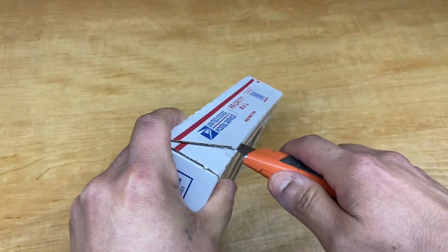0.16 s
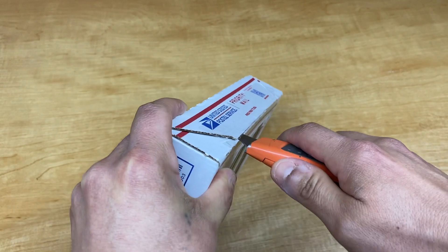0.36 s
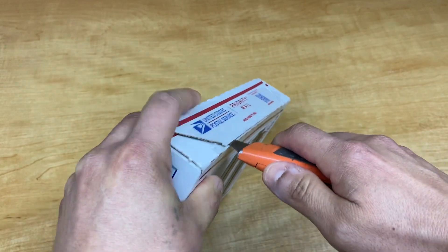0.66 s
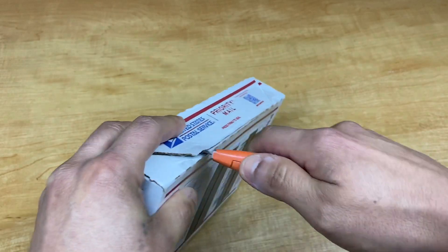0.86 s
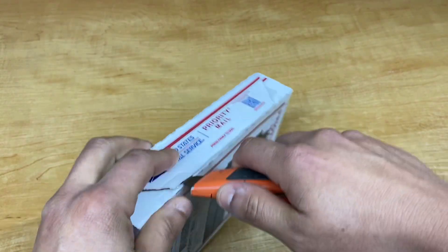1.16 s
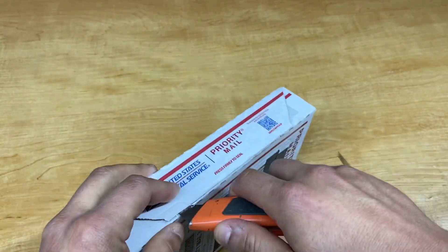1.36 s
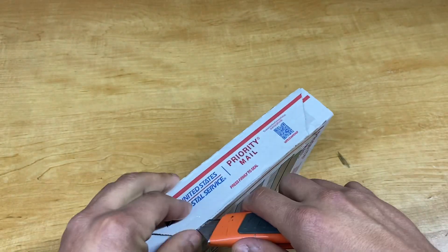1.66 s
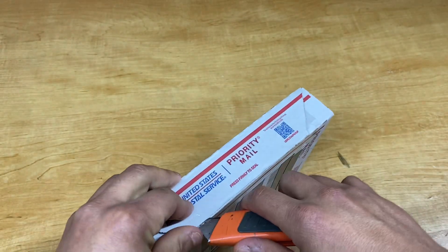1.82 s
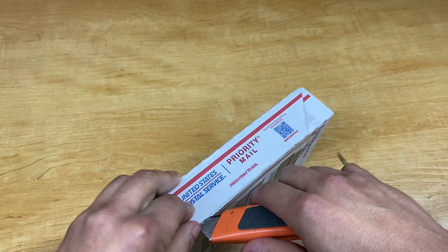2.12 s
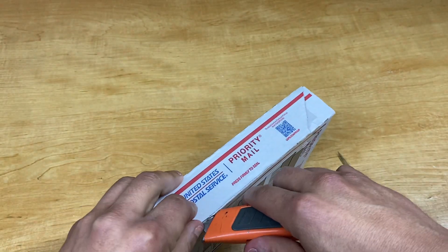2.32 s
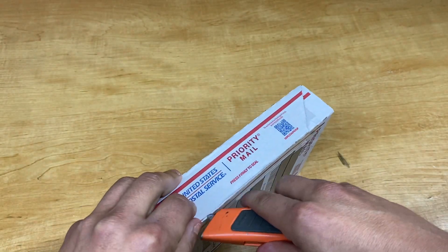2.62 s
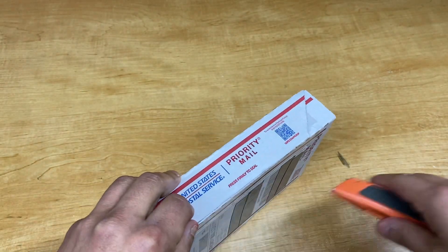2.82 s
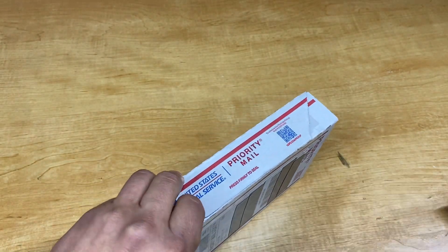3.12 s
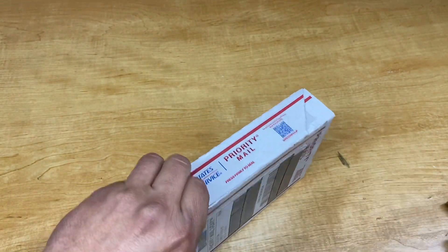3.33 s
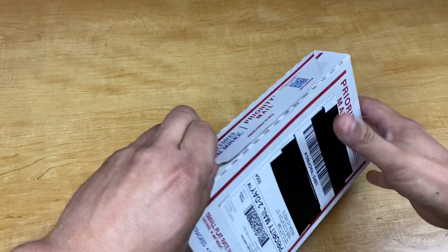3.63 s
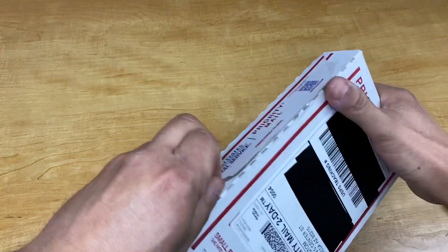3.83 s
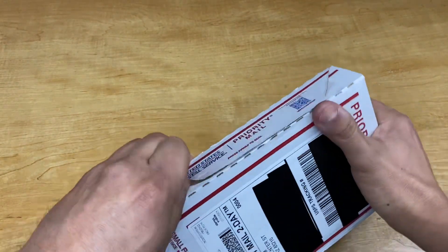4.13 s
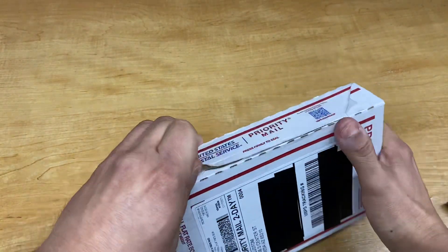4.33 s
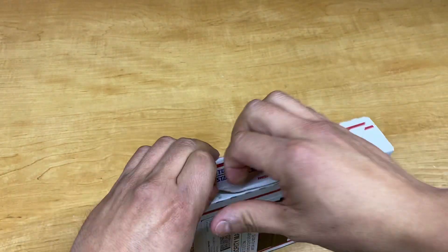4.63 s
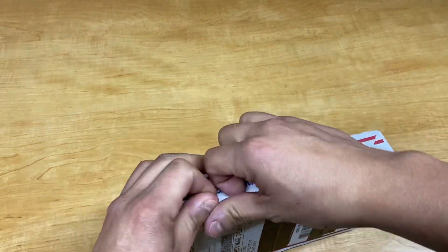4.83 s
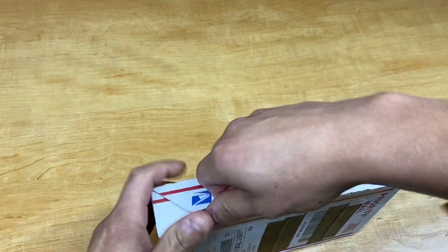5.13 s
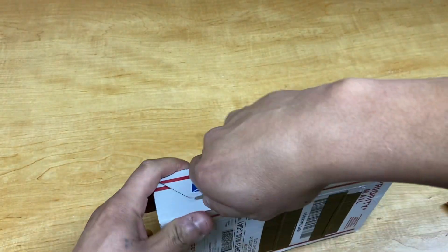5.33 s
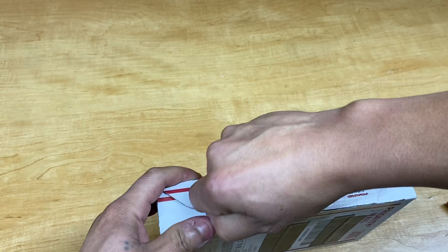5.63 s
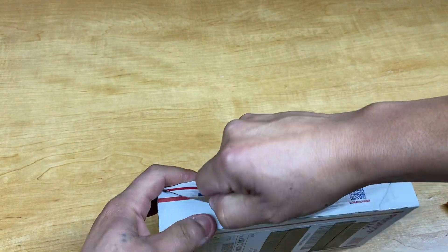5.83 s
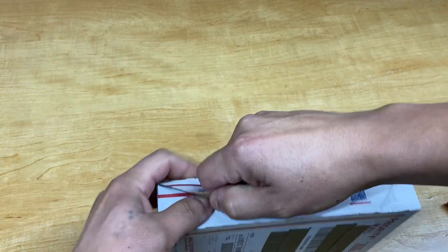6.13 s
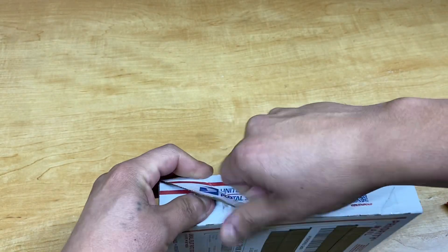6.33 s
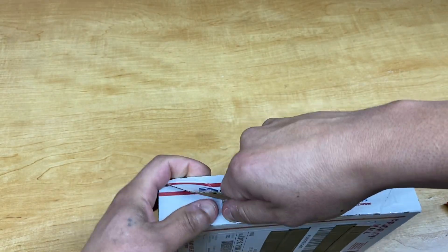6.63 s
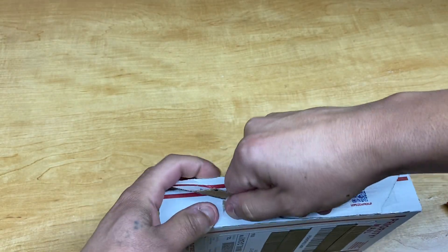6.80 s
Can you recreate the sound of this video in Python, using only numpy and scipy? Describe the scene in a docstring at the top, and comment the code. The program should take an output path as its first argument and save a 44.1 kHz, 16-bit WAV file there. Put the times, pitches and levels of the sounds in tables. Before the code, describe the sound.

Quiet picking and slicing of tape, with a faint steel ping and dry ticks, comes first. At about three seconds the plastic-handled knife thuds and clatters on a table, slightly right. Hollow box knocks follow, then fingers rub, flex and tear stiff card in hissing strokes. Close stereo pickup, short indoor reflections.

```python
"""Opening a cardboard mailing box

Close to the microphone, on a wooden table in a small room, a utility knife picks and slices at the tape
and is dropped on the table; hands turn and grip the hollow box, then rip the flap open in long pulls.
Box, table and knife ring as struck modes; snaps and crunches are bursts of filtered noise; friction and
rubbing are showers of random clicks; flexing and room air are shaped noise, the room a decaying noise tail.
"""
import sys
import numpy as np
from scipy import signal
from scipy.fft import rfft, irfft
from scipy.io import wavfile
from scipy.ndimage import uniform_filter1d

SR = 44100
rng = np.random.default_rng(int(sys.argv[2]) if len(sys.argv) > 2 else 0)


def materialize(psi):
    """Save the field psi as 16-bit PCM at rate SR to the path in sys.argv[1].

    A 1-D psi becomes a single channel; in a 2-D psi each row is a channel.
    """
    bounded = np.clip(np.atleast_2d(psi).T, -1, 1)
    quanta = np.round(bounded * 32767).astype(np.int16)
    wavfile.write(sys.argv[1], SR, quanta)


N = 306936
TIME = np.arange(N) / SR
HIT_TIME = TIME[:SR // 2]  # half a second for each hit and for the room tail

# Modes of the box: air cavity, wide panels, stiff edges; each hit may shift the pitch of panels and edges.
# Each row: unshifted frequency in Hz, relative level in dB, t60 in s.
CAVITY_MODES = [(71.7, 4, 0.21), (113.5, 5, 0.26), (158, 8, 0.11)]
PANEL_MODES = [(332.3, -7, 0.079), (399, 3, 0.043), (450, 8.5, 0.021), (600.4, -1, 0.038)]
EDGE_MODES = [(971, 4.5, 0.016), (1250, 1, 0.025), (1400, 4, 0.0097), (1910, -5, 0.0092)]


def from_db(db):
    """Turn decibels into an amplitude factor."""
    return 10 ** (np.asarray(db) / 20)


def rms_one(x):
    """Scale a signal to an RMS of 1."""
    return x / np.sqrt(np.mean(x ** 2) + 1e-20)


def at_hz(points, hz, axis=1):
    """Read a column of a table on a log-frequency axis."""
    points = np.array(points)
    return np.interp(np.log(hz + 1), np.log(points[:, 0]), points[:, axis])


def colour(x, spectrum):
    """Weight a signal with a spectrum in dB."""
    gain = from_db(at_hz(spectrum, np.fft.rfftfreq(N, 1 / SR)))
    return irfft(rfft(x) * gain, N)


def band(x, low_hz, high_hz):
    """Causal band-pass."""
    edges_hz = [low_hz, min(high_hz, 0.45 * SR)]
    return signal.sosfilt(signal.butter(2, edges_hz, "band", fs=SR, output="sos"), x + 1e-18)


def soften(x, cutoff_hz):
    """A soft contact passes only the low part of a push."""
    return signal.sosfilt(signal.butter(4, min(cutoff_hz, SR / 3), fs=SR, output="sos"), x)


def drift(rate):
    """Random wandering with RMS 1, through this many new values per second."""
    knots = rng.standard_normal(N // 40)
    return rms_one(np.interp(TIME * rate, np.arange(len(knots)), knots))


def add(out, s, sound):
    """Mix a sound in at a time in seconds."""
    start = max(round(s * SR), 0)
    out[start:start + len(sound)] += sound[:N - start]


def at_level(x, db):
    """Scale a hit so that its loudest 20 ms have this RMS level."""
    loudest = np.sqrt(uniform_filter1d(x ** 2, SR // 50).max() + 1e-20)
    return x * from_db(db) / loudest


def contact(chatter, t60, rise_s=0.00049, uneven_db=4.0):
    """One push with a dying chatter of tiny uneven slips."""
    slips, sizes = rng.standard_normal((2, len(HIT_TIME)))
    decay = from_db(uneven_db * sizes - 60 * HIT_TIME / t60)
    slips = slips * decay * (1 - np.exp(-HIT_TIME / rise_s))
    push = HIT_TIME == 0
    return push + chatter * slips / np.linalg.norm(slips)


def ring(force, modes, lag_s, pitch=1):
    """A force rings decaying modes, each at a strength that varies by chance; low bending waves arrive later."""
    out = 0
    for k, (hz, db, t60) in enumerate(modes):
        r = from_db(-60 / (t60 * SR))
        w = 2 * np.pi * hz * pitch / SR
        tone = signal.lfilter([0, np.sin(w)], [1, -2 * r * np.cos(w), r * r], force + 1e-18)
        delay_s = lag_s * np.sqrt(100 / hz)  # lag_s is the delay at 100 Hz
        late = np.interp(HIT_TIME - delay_s, HIT_TIME, tone, left=0)
        out = out + (-1) ** k * late * from_db(db + 2 * rng.standard_normal())
    return out


def grains(per_s, size_db):
    """Fibres let go at random: many tiny clicks, a few large ones."""
    sizes = from_db(size_db * np.minimum(rng.exponential(1, N), 5))
    return sizes * rng.standard_normal(N) * (rng.random(N) < per_s / SR)


def box_blows():
    """Blows ring cavity, panels and edges as the surface crunches; less crack means lower panels and edges."""
    # Blows on the box. Each row: start in seconds, then levels in dB of air cavity, panels, edges,
    # crack and fibres.
    blows = [(0.007, -49, -45.5, -41.5, -46, -53.5), (0.244, -87.5, -75, -48, -57.5, -65),
             (1.24, -86, -52.5, -46.5, -49.5, -64), (1.518, -43.5, -51, -67, -47.5, -39.5),
             (1.585, -58, -73, -55.5, -55, -46), (1.8, -50.5, -45, -45.5, -53.5, -50.5),
             (1.911, -53, -57.5, -56, -50, -61), (2.092, -46, -46.5, -46.5, -52.5, -58),
             (2.514, -55, -47.5, -41, -44.5, -37), (2.593, -46.5, -42, -47.5, -45, -47),
             (3.537, -32, -27.5, -34.5, -31.5, -34), (3.816, -43.5, -43.5, -47.5, -51.5, -52),
             (3.939, -52, -51.5, -52, -57.5, -55), (4.223, -63, -45, -44.5, -42, -42.5),
             (4.391, -35.5, -37.5, -44.5, -50, -53), (4.492, -34, -30.5, -37.5, -59.5, -61),
             (4.608, -39, -46, -37.5, -51, -52.5), (5.442, -58, -40, -46, -50, -57.5),
             (6.057, -43.5, -46, -53.5, -49.5, -48.5)]
    out = np.zeros(N)
    for s, cavity_db, panel_db, edge_db, crack_db, fibre_db in blows:
        push = contact(chatter=1.36, t60=0.035)
        crunch = contact(chatter=3.7, t60=0.043)
        panel_pitch = 1 + 0.0027 * (crack_db - panel_db)
        edge_pitch = 1.127 * from_db(0.15 * (crack_db - edge_db))
        add(out, s, at_level(ring(push, CAVITY_MODES, lag_s=0.00798), cavity_db))
        add(out, s, at_level(ring(push, PANEL_MODES, lag_s=0.00659, pitch=panel_pitch), panel_db))
        add(out, s, at_level(ring(push, EDGE_MODES, lag_s=0, pitch=edge_pitch), edge_db))
        add(out, s, at_level(band(crunch, 1300, 6800), crack_db))
        add(out, s, at_level(band(crunch, 7000, 15000), fibre_db))
    return out


def held_pitch():
    """Each bump finds the walls tuned up to 4 % higher or lower by the hold."""
    return 1 + rng.uniform(-0.04, 0.04)


def bumps():
    """Fingers land and walls buckle: soft pushes into all the modes of the box."""
    # Fingers bump the walls and the card buckles.
    # Each row: start in seconds, level in dB, contact softness as a low-pass cut-off in Hz.
    soft_pushes = [(2.406, -52, 1610), (2.603, -49.5, 450), (2.795, -59.5, 1800), (3.41, -44.5, 1400),
                   (3.627, -51, 1800), (4.274, -44.5, 1470), (4.719, -42.5, 286), (5.074, -44, 1810),
                   (5.112, -44.5, 360), (5.461, -44, 1120), (5.967, -48.5, 605), (6.076, -43, 167),
                   (6.289, -42.5, 202)]
    out = np.zeros(N)
    for s, db, soft_hz in soft_pushes:
        push = soften(contact(chatter=1.5, t60=0.052), soft_hz)
        walls = ring(push, PANEL_MODES + EDGE_MODES, lag_s=0, pitch=held_pitch())
        cavity = from_db(-13) * ring(push, CAVITY_MODES, lag_s=0)
        add(out, s, at_level(walls + cavity, db))
    return out


def snaps(gain_db=-15.0, width=4.0, t60_at_1_hz=1.0):
    """Tape and card give way in a tight cluster of cracks; the higher its pitch, the sooner it is over."""
    # Snaps of tape and card. Each row: start in seconds, level in dB before gain_db, centre in Hz.
    cracks = [(0.262, -45.5, 1300), (0.4847, -25.5, 2510), (0.857, -40.5, 6440), (0.975, -39.5, 1290),
              (1.236, -39.5, 4270), (1.4979, -29.5, 2250), (1.771, -32.5, 5570), (1.795, -28.5, 5900),
              (2.303, -47, 1670), (2.398, -37.5, 8800), (2.549, -29, 9400), (2.6867, -39, 13000),
              (2.925, -41.5, 2620), (3.803, -35, 2020), (3.881, -49, 900), (3.901, -39, 1470),
              (4.188, -40.5, 1400), (4.262, -41, 1400), (4.399, -30, 2980), (5.06, -31, 3410),
              (5.52, -34.5, 2410), (5.7812, -30.5, 9520), (6.159, -31, 6300), (6.797, -31, 9800)]
    out = np.zeros(N)
    for s, db, hz in cracks:
        cluster = contact(chatter=2.1, t60=t60_at_1_hz / np.sqrt(hz))
        add(out, s, at_level(band(cluster, hz / width, hz * width), db + gain_db))
    return out


def stroke_levels():
    """Gains of scrape and hiss: both rise and fall with the speed of each stroke."""
    # Strokes of blade, fingers and tearing flap; each gathers speed, then runs out.
    # Each row: time of greatest speed in seconds, swell in s, fade in s, scrape in dB, fibre hiss in dB.
    strokes = [(0.572, 0.071, 0.15, -58, -61), (0.994, 0.058, 0.2, -55, -53), (1.3, 0.44, 0.19, -63.5, -69),
               (1.422, 0.062, 0.11, -50.5, -51), (2.555, 0.084, 0.11, -62.5, -61),
               (3.308, 0.054, 0.11, -55, -58), (3.433, 0.067, 0.059, -54.5, -55.5),
               (3.8, 0.47, 0.13, -65, -64.5), (4.073, 0.053, 0.068, -62, -48),
               (4.269, 0.16, 0.097, -62, -60.5), (4.66, 0.27, 0.058, -65, -79),
               (4.745, 0.039, 0.04, -54.5, -78), (4.91, 0.083, 0.15, -60.5, -57.5),
               (5.11, 0.14, 0.043, -55, -56.5), (5.49, 0.071, 0.12, -57.5, -59.5),
               (5.661, 0.13, 0.19, -49, -39.5), (5.831, 0.33, 0.1, -54.5, -48),
               (5.979, 0.028, 0.16, -50, -74), (6.259, 0.2, 0.26, -57, -58),
               (6.451, 0.04, 0.044, -50.5, -99), (6.744, 0.15, 0.068, -59.5, -43),
               (6.94, 0.044, 0.03, -54, -61)]
    depth_db, roundness = 20.5, 1.455  # drop at the ends of swell and fade; 1 = pointed, 2 = bell-shaped
    resting_db = -88  # fingers lying on the card
    power = from_db(resting_db) ** 2
    for s, swell_s, fade_s, *levels_db in strokes:
        away = np.maximum((s - TIME) / swell_s, (TIME - s) / fade_s)
        speed = from_db(-depth_db * np.minimum(away, 10) ** roundness)
        power = power + np.outer(from_db(levels_db), speed) ** 2
    return np.sqrt(power)


def shifting(x, patchy_db=2.0, per_s=28):
    """The contact wanders over the card, so each octave swells and sinks on its own."""
    spectrum, out = rfft(x), 0
    octave = np.log2(np.fft.rfftfreq(N, 1 / SR) + 1)
    for k in range(7, 15):  # overlapping bands centred on 2**k Hz
        weight = np.maximum(1 - abs(octave - k), 0)
        out = out + irfft(spectrum * weight, N) * from_db(patchy_db * drift(per_s))
    return rms_one(out)


def friction(scrape_gain, hiss_gain, judder_db=2.12, crackle_db=-10.5):
    """Sticking and slipping jerks shed fine and coarse fibres, while breaking bundles crackle."""
    # Colours of fine hiss and coarse scrape. Each row: frequency in Hz, relative level in dB.
    hiss_colour = [(800, -16.5), (1230, -7.5), (2200, -13), (4000, 2), (9500, 15.5), (13200, 12.5),
                   (16000, 1)]
    scrape_colour = [(720, -4.5), (1280, 3.5), (2200, -5.5), (3200, -2), (5000, -3), (11000, -11)]
    jerks = from_db(judder_db * (drift(220) + drift(40) / 2))
    fine = colour(grains(per_s=14000, size_db=1.0) * jerks, hiss_colour)
    coarse = colour(grains(per_s=3500, size_db=1.14) * jerks, scrape_colour)
    bundles = rms_one(band(grains(per_s=260, size_db=2.5), 2000, 7500))
    hiss = hiss_gain * rms_one(fine)
    scrape = scrape_gain * shifting(coarse)
    crackle = from_db(crackle_db) * scrape_gain * bundles
    return hiss + scrape + crackle


def knife_drop(handle_pan_db=-4.5, rattle_low_hz=260, rattle_high_hz=2600):
    """The hollow handle clacks off to the right and rattles, the table thuds; then a duller knock."""
    # The knife lands and rocks down. Each row: start in seconds, table in dB, handle in dB, rattle in dB,
    # contact softness as a low-pass cut-off in Hz.
    drops = [(3.0849, -22, -24, -27.5, 9400), (3.185, -27, -46.5, -32, 810)]
    # Modes of table top and hollow handle. Each row: frequency in Hz, relative level in dB, t60 in s.
    table_modes = [(111.5, -5.5, 0.33), (160, 4.5, 0.04), (322, -11, 0.25), (398, 5, 0.029),
                   (454, -3.5, 0.024)]
    handle_modes = [(1000, -4.5, 0.04), (1397, 4.5, 0.025), (1400, -17.5, 0.257), (1540, 1, 0.0093),
                    (1955, -12, 0.015)]
    table, handle = np.zeros((2, N))
    for s, table_db, handle_db, rattle_db, soft_hz in drops:
        push = contact(chatter=0.4, t60=0.007)
        thud = soften(ring(push, table_modes, lag_s=0.01124), soft_hz)
        clack = soften(ring(push, handle_modes, lag_s=0), soft_hz)
        rattle = soften(band(contact(chatter=10.0, t60=0.051), rattle_low_hz, rattle_high_hz), soft_hz)
        add(table, s, at_level(thud, table_db) + at_level(rattle, rattle_db))
        add(handle, s, at_level(clack, handle_db))
    return table + handle * from_db([[handle_pan_db], [-handle_pan_db]])


def blade(cut_db=-70.5, low_hz=3180, high_hz=3480, fade_s=0.066, t60=0.042):
    """The steel blade pings when it catches, and sings roughly while it is drawn through the tape."""
    # The blade catches and pings, lower when more of it is free.
    # Each row: start in seconds, level in dB, pitch in Hz.
    pings = [(0.486, -47, 2512), (1.241, -53, 3250)]
    # The draw through the tape: start in seconds, end in seconds.
    start_s, end_s = (1.03, 1.5)
    drawn = np.clip(np.minimum(TIME - start_s, end_s - TIME) / fade_s, 0, 1)
    singing = rms_one(band(grains(per_s=740, size_db=4.0), low_hz, high_hz))
    out = from_db(cut_db) * drawn * singing
    for s, db, hz in pings:
        add(out, s, at_level(ring(HIT_TIME == 0, [(hz, db, t60)], lag_s=0), db))
    return out


def grip_levels():
    """Gains of rub and flexing: each grip builds quickly, holds and eases off."""
    # A hand presses, holds and lets go of the box. Each row: start of the hold in seconds, hold in s,
    # wall rub in dB, flexing in dB; flexing() trims and varies both.
    grips = [(0.01, 0.018, -58, -59), (0.545, 0.11, -63.5, -55.5), (1.512, 0.014, -53.5, -43),
             (2.077, 0.082, -60, -59), (2.273, 0.19, -61.5, -63), (2.52, 0.13, -54, -51),
             (2.982, 0.19, -58, -55.5), (3.22, 0.18, -54.5, -55), (3.6, 0.11, -53, -55),
             (3.805, 0.087, -52.5, -55.5), (4.445, 0.24, -54.5, -50), (4.87, 0.2, -55.5, -61),
             (5.155, 0.29, -61.5, -57.5), (5.418, 0.45, -56, -54), (5.963, 0.15, -55, -59),
             (6.176, 0.33, -58, -55), (6.913, 0.029, -50.5, -57)]
    press_db_per_s, relax_db_per_s = 813, 96  # how fast a grip builds and eases
    resting_db = -76  # hands merely holding the box
    power = from_db(resting_db) ** 2
    for s, hold_s, *levels_db in grips:
        before = np.clip(s - TIME, 0, 1)
        after = np.clip(TIME - s - hold_s, 0, 1)
        pressure = from_db(-press_db_per_s * before - relax_db_per_s * after)
        power = power + np.outer(from_db(levels_db), pressure) ** 2
    return np.sqrt(power)


def flexing(grip_gain_db=-3.5, lumpy_db=4.0):
    """Shifting hands rub the walls in small separate slips and pump the air inside the box."""
    # Colours of wall rub and pumped air. Each row: frequency in Hz, relative level in dB.
    rub_colour = [(220, -6), (350, 8.5), (450, 6.5), (720, -8), (1400, -5), (4500, -44)]
    rumble_colour = [(25, -19), (55, 4.5), (130, 4.5), (320, -28.5)]
    rub_gain, flex_gain = grip_levels()
    grip = from_db(grip_gain_db + lumpy_db * drift(30))
    slips = grains(per_s=3000, size_db=2)
    rub = rub_gain * rms_one(colour(slips, rub_colour))
    pumped_air = flex_gain * rms_one(colour(rng.standard_normal(N), rumble_colour))
    return grip * (rub + pumped_air)


def creaks(per_s=22, spread_db=4, low_hz=500, high_hz=2000):
    """The squeezed card ticks at random, each time at another spot with its own pitch."""
    out = np.zeros(N)
    rub_gain, _ = grip_levels()
    for place, weakness, spot in rng.random((round(per_s * N / SR), 3)):
        hz = low_hz * (high_hz / low_hz) ** spot  # top of the tick's one-octave band
        i = int(place * N)
        tick = band(contact(chatter=1.5, t60=0.016), hz / 2, hz)
        add(out, TIME[i], rub_gain[i] * at_level(tick, -spread_db * weakness))
    return out


def room(x):
    """Diffuse reflections, different at each side, dying at their own pace in each octave."""
    # The small room. Each row: frequency in Hz, t60 in s, level in dB of the octave's tail.
    reverberation = [(101, 0.95, -20), (432, 0.25, -6), (2450, 0.29, -3), (13000, 0.17, -13)]
    tail = 0
    edges_hz = 40 * 2.0 ** np.arange(10)
    for low, high in zip(edges_hz, edges_hz[1:]):
        hz = np.sqrt(low * high)
        fade = from_db(-60 * HIT_TIME / at_hz(reverberation, hz))
        fade = fade * (HIT_TIME > 0.002)  # reflections come after the direct sound
        noise = band(rng.standard_normal((2, len(HIT_TIME))), low, high)
        level = from_db(at_hz(reverberation, hz, axis=2))
        tail = tail + noise * fade / np.linalg.norm(fade) * level
    return signal.fftconvolve(x[None], tail, axes=1)[:, :N]


def scene(air_db=-76.0):
    """Everything happens close by on the table, over the faint air of the room."""
    # Colour of the quiet room. Each row: frequency in Hz, relative level in dB.
    air_colour = [(25, -12.5), (100, 13.5), (400, 10), (1300, -12.5), (2800, -5), (4500, -4.5),
                  (8000, -84.5)]
    box = box_blows() + bumps() + snaps()
    knife = blade() + knife_drop()
    hands = friction(*stroke_levels()) + flexing() + creaks()
    direct = box + knife + hands
    # one noise shared by both sides plus one for each side
    noise = rng.standard_normal(N) + rng.standard_normal((2, N))
    air = rms_one(colour(noise, air_colour))
    return direct + room(direct.mean(axis=0)) + from_db(air_db) * air


def record(dry):
    """A microphone pair: sides differ in colour, ports turn the right's phase; deep bass and top are cut."""
    # Left-right balance. Each row: frequency in Hz, left over right in dB.
    balance = [(120, -1.5), (450, 0), (1300, 1), (2200, 3), (5000, 3.5), (8500, 0)]
    # Port resonances at the right side. Each row: frequency in Hz, width in Hz.
    ports = [(8700, 1360), (12150, 2120), (15700, 2300)]
    left = colour(dry[0], [(hz, db / 2) for hz, db in balance])
    right = colour(dry[1], [(hz, -db / 2) for hz, db in balance])
    for hz, width in ports:
        r = np.exp(-np.pi * width / SR)
        poles = [1, -2 * r * np.cos(2 * np.pi * hz / SR), r * r]
        right = signal.lfilter(poles[::-1], poles, right)  # all-pass: turns phase, keeps level
    bass_cut = signal.butter(4, 38, "high", fs=SR, output="sos")
    top_cut = signal.ellip(10, 0.1, 80, 16100, fs=SR, output="sos")
    return signal.sosfilt(top_cut, signal.sosfilt(bass_cut, [left, right]))


dry = scene()
out = record(dry)
materialize(out)
```